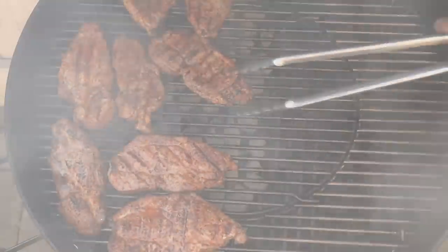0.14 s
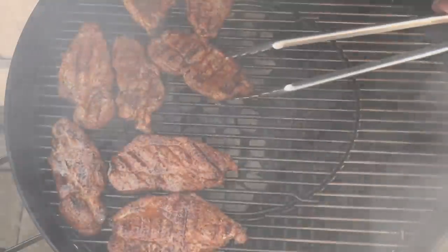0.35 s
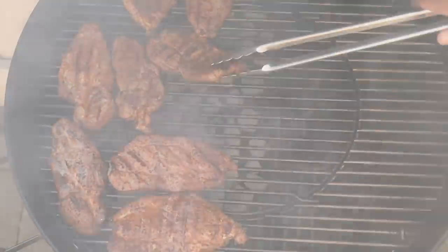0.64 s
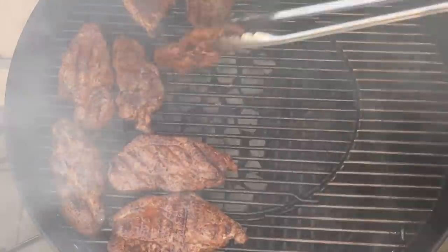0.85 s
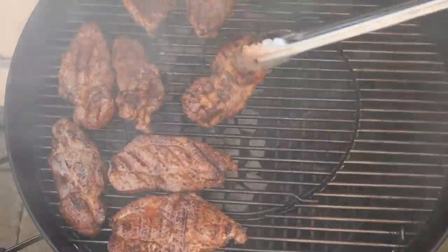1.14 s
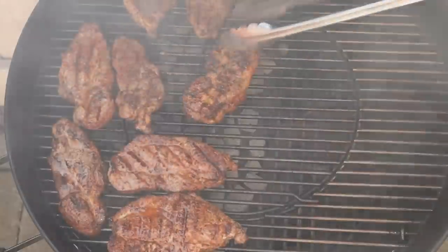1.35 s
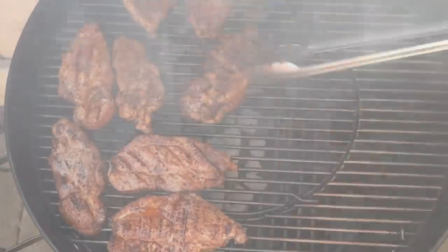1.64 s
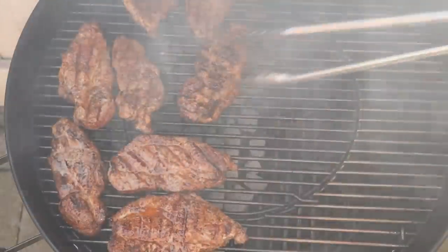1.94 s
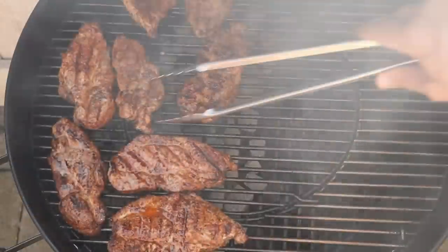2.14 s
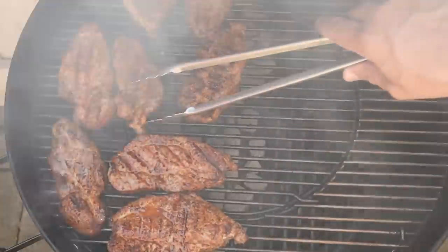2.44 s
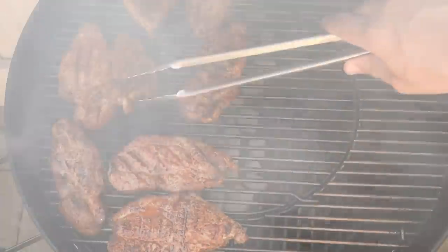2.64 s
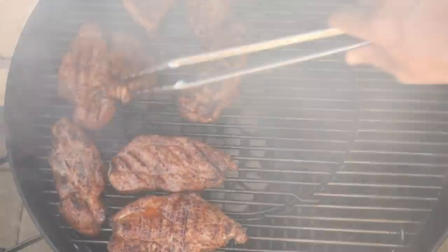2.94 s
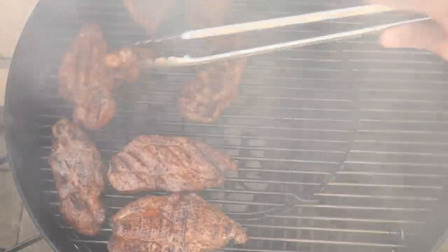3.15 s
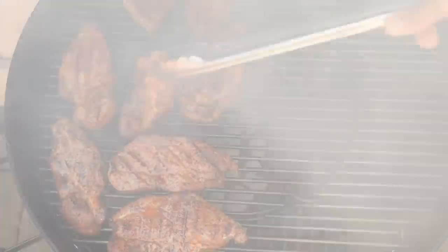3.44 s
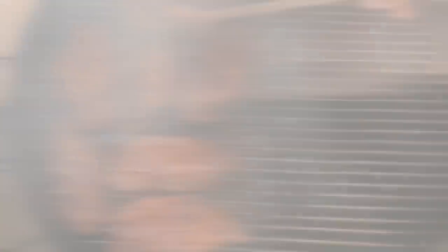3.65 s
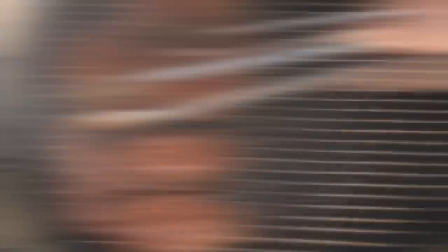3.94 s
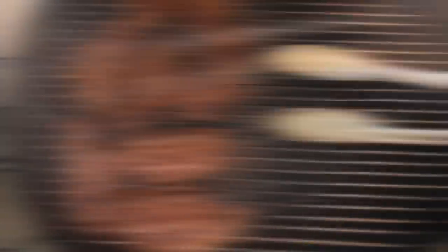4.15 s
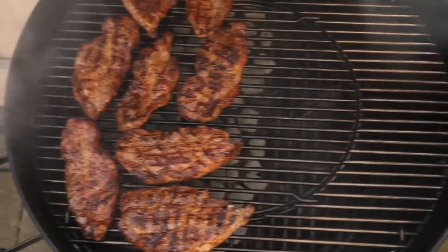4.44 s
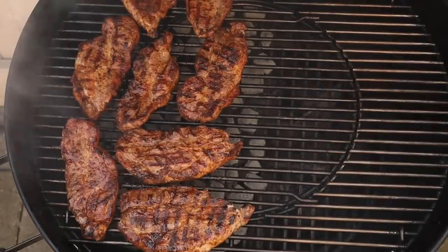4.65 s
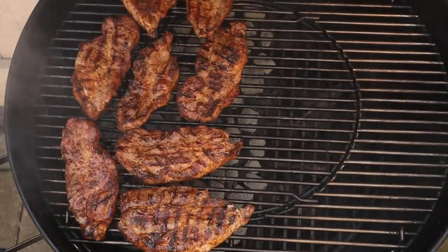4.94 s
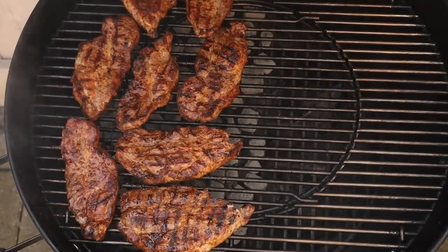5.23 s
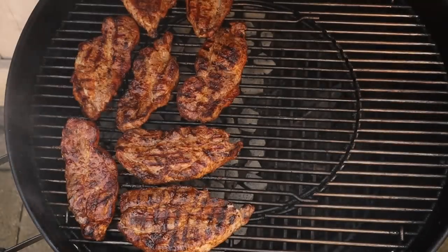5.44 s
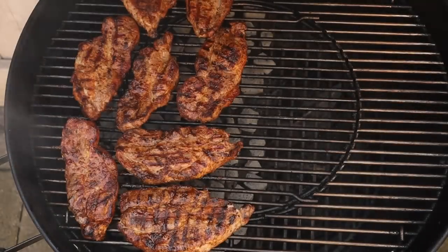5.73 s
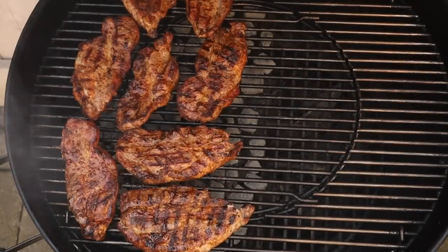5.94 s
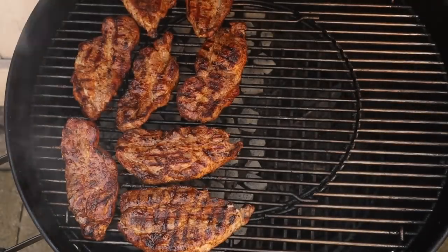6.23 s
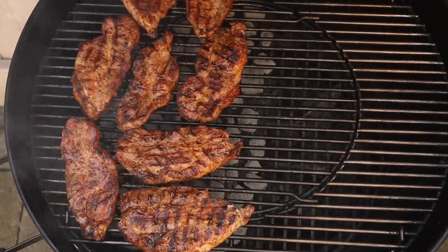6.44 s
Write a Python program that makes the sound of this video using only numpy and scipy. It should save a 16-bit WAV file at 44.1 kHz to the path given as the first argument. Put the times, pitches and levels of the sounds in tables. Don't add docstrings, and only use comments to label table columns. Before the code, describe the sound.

Close to the microphone, meat fizzes on a kettle grill outdoors over faint town hum and distant traffic. Faint tong taps and fat pops come first; a turned piece hisses up brightly, then dripping fat flares on the coals. After a soft change the sizzle calms, and tongs scrape wood, drop hard and clatter to a stop.

```python
import sys
import numpy as np
from scipy import signal
from scipy.fft import rfft, irfft, next_fast_len
from scipy.io import wavfile
from scipy.ndimage import uniform_filter1d

SR = 44100
rng = np.random.default_rng(int(sys.argv[2]) if len(sys.argv) > 2 else 0)


def voltage_ratio(decibels):
    exponent = np.asarray(decibels, float) / 20
    return 10 ** exponent


def wav_out(sig):
    wavfile.write(sys.argv[1], SR, np.round(np.clip(np.atleast_2d(sig).T, -1, 1) * 32767).astype(np.int16))


N = 290619
TIME = np.arange(N) / SR
GROUND_MS = 3.45
TOP_HZ = 15750
# (time [s], browned side [0-1], freshly turned side [0-1], later moment [0-1])
STAGE = [
    (0, 0.94, 0, 0.01),
    (1.215, 0.82, 0.05, 0.02),
    (1.27, 0.31, 0.98, 0.05),
    (3.97, 0.09, 0.89, 0.09),
    (4.03, 0.03, 0.65, 0.23),
    (4.6, 0.01, 0.01, 0.85),
    (6.59, 0.15, 0.26, 1),
]


def read(table):
    s, *columns = np.transpose(table)
    return [np.interp(TIME, s, column) for column in columns]


def unit(x, lo_hz, hi_hz):
    f = np.fft.rfftfreq(N, 1 / SR)
    power = np.abs(rfft(x)) ** 2
    return x * N / np.sqrt(2 * power[(f > lo_hz) & (f < hi_hz)].sum())


def colour(x, spectrum, echoes):
    hz, db = np.transpose(spectrum)
    f = np.fft.rfftfreq(4096, 1 / SR)
    log_gain = np.interp(np.log(f + 1), np.log(hz), db) * np.log(10) / 20
    cepstrum = irfft(log_gain)
    cepstrum[1:2048] *= 2
    cepstrum[2049:] = 0
    comb = 1 + sum(gain * np.exp(-2j * np.pi * f * ms / 1000) for ms, gain in echoes)
    return signal.fftconvolve(x, irfft(np.exp(rfft(cepstrum)) * comb))[:N]


def band(x, hz, width_hz):
    return signal.lfilter(*signal.iirpeak(hz, hz / width_hz, SR), x)


def walk(rate):
    k = int(SR / rate)
    steps = np.repeat(rng.standard_normal(N // k + 1), k)
    return 1.44 * uniform_filter1d(uniform_filter1d(steps, k), k)[:N]


def bubbles(rate, spread_db, steam):
    burst = rng.random(N) < rate / SR
    sign = rng.standard_normal(N)
    size = rng.exponential(size=N)
    noise = rng.standard_normal(N)
    pops = burst * sign * voltage_ratio(spread_db * np.minimum(size, 4))
    share = np.clip(steam, 0, 1)
    return np.sqrt(1 - share) * pops / pops.std() + np.sqrt(share) * noise


def ring(hz, t60, length=.15):
    t = TIME[:int(length * SR)]
    return np.sin(2 * np.pi * hz * t) * np.exp(-np.log(1000) * t / t60)


def add(out, s, sound):
    i = int(s * SR)
    out[i:i + len(sound)] += sound[:N - i]


def gusts(events, rate, steam, flicker_db):
    out = 0
    for s, rise, hold, t60, hz, width_hz, db in events:
        fade = voltage_ratio(-60 * np.maximum(TIME - s - rise - hold, 0) / t60)
        shape = np.clip((TIME - s) / rise, 0, 1) * fade
        grains = band(band(bubbles(rate, 2.6, steam), hz, width_hz), hz, 1.8 * width_hz)
        out = out + voltage_ratio(db + flicker_db * walk(60)) * shape * grains / grains.std()
    return out


def garden():
    # (frequency [Hz], level [dB per Hz])
    hum_colour = [(59, -51), (100, -2.5), (356, -2), (394, -2), (579, -1), (718, -4.5), (842, -5),
                  (1500, -10), (1950, -31), (3300, -120)]
    # (frequency [Hz], level [dB per Hz])
    rumble_colour = [(15, -30), (30, -10), (48, -14.5), (60, -6), (69, 2), (80, -6), (120, -6),
                     (170, -10.5), (300, -42.5)]
    # (time [s], half length [s], extra level [dB])
    traffic = [
        (0.0, 0.2, 4.5),
        (0.7, 0.08, 3),
        (1.98, 0.15, 0.5),
        (2.46, .04, -9),
        (3.317, .06, 7.0),
        (3.58, 0.13, 6.5),
        (3.925, 0.12, 5),
        (4.3, .12, -6),
        (5.55, 0.14, -4.0),
    ]
    hum_db, late_hum_db = -57.5, -62.5
    rumble_db, late_rumble_db = -67.5, -68.5
    later = np.clip(read(STAGE)[2], 0, 1)
    early_hum, late_hum = (unit(colour(rng.standard_normal(N), hum_colour, [(GROUND_MS, gain)]), 150, 1130)
                           for gain in (.55, .15))
    hum = np.sqrt(1 - later) * voltage_ratio(hum_db) * early_hum + np.sqrt(later) * voltage_ratio(late_hum_db) * late_hum
    rumble = unit(colour(rng.standard_normal(N), rumble_colour, []), 40, 123)
    swell_db = sum(db * np.exp(-((TIME - s) / half) ** 2) for s, half, db in traffic)
    level_db = rumble_db + later * (late_rumble_db - rumble_db) + swell_db
    return voltage_ratio(1.0 * walk(8)) * hum + voltage_ratio(level_db + 1.4 * walk(9)) * rumble


def drags():
    # (time [s], hold [s], frequency [Hz], width [Hz], level [dB])
    scrapes = [(5.11, .12, 800, 160, -50.5), (5.12, 0.052, 2800, 780, -59), (5.115, 0.066, 1020, 120, -58),
               (5.13, 0.07, 2050, 350, -51), (5.28, 0.032, 800, 130, -47.5), (5.191, 0.04, 230, 100, -56),
               (0.086, 0.19, 220, 160, -58), (5.36, .08, 160, 98, -54), (4.9, .025, 215, 110, -57),
               (5.73, 0.027, 125, 54, -51.5), (5.13, .12, 300, 350, -60), (5.4, .06, 350, 400, -53),
               (5.69, 0.052, 450, 600, -54), (1.083, 0.13, 360, 810, -61), (4.0, .4, 600, 800, -60),
               (5.72, .04, 95, 50, -63), (2.31, 0.26, 150, 70, -66)]
    events = [(s, 0.4 * hold, hold, 4.1 * hold, hz, width_hz, db) for s, hold, hz, width_hz, db in scrapes]
    return gusts(events, 1500, 0.54, 0.99)


def knocks():
    # (time [s], peak level [dB], board frequency [Hz], crack level [dB], crack frequency [Hz])
    landings = [(5.354, -23, 420, -7.5, 2100), (5.362, -35, 280, 1, 2120), (5.371, -44, 328, -6, 2240),
                (5.381, -42, 360, -1, 2090), (5.393, -38, 355, -11, 2200), (5.404, -44, 444, -5, 1920),
                (5.429, -30.5, 356, 0, 1400), (5.444, -36, 397, -4, 1470), (5.462, -39, 394, -10, 1900),
                (5.474, -51, 353, -6, 1790), (5.5, -48, 361, -12, 1870), (5.633, -28.5, 403, -6.5, 2300),
                (5.644, -39, 310, -18, 1110), (5.655, -38, 480, -19, 2550), (5.684, -45, 468, -15, 1880),
                (5.704, -36, 357, -16, 1890), (5.726, -39, 538, -6, 1110), (5.734, -38, 476, -6, 1400),
                (5.752, -34, 378, -11, 1300), (5.769, -39.5, 482, -15, 1340), (5.786, -44, 511, -13, 1880),
                (5.799, -48, 462, -5, 1820)]
    # (frequency [Hz], t60 [s], level [dB])
    table_modes = [(150, .06, -32), (213, .06, -24), (326, 0.071, -10), (530, 0.053, -7.5),
                   (740, .04, -9.5), (830, 0.033, -10.5), (1060, 0.025, -16)]
    push_ms, crack_rise_ms = 3.85, 1.7
    out, t = np.zeros(N), TIME[:int(.15 * SR)]
    for s, db, board_hz, crack_db, crack_hz in landings:
        rough = rng.standard_normal(len(t))
        weight = voltage_ratio(2.0 * rng.standard_normal(len(table_modes)))
        push = rough * np.exp(-t * 1000 / push_ms)
        board = ring(board_hz, 0.038) * np.minimum(t * 1000 / push_ms, 1)
        modes = sum(w * voltage_ratio(mode_db + (crack_db + 11.0 if hz > 700 else 0)) * ring(hz, t60)
                    for w, (hz, t60, mode_db) in zip(weight, table_modes))
        shaken = signal.fftconvolve(modes, push / np.sqrt(np.sum(push ** 2)))[:len(t)]
        crack_fade = np.exp(-t / 0.0065) + 0.45 * np.exp(-t / 0.02)
        crack = rough * np.minimum(t * 1000 / crack_rise_ms, 1) * crack_fade
        crack = band(band(band(crack, crack_hz, 2000), 1500, 2600), 1700, 3600)
        blow = board / np.abs(board).max() + 0.79 * shaken + voltage_ratio(crack_db + 8.0) * crack
        add(out, s - .001, voltage_ratio(db) * blow)
    t = TIME[:9000]
    walls = rng.standard_normal(9000) * voltage_ratio(-60 * t / 0.24) * np.minimum(t / 0.0071, 1)
    wet = out + voltage_ratio(-40.0) * signal.fftconvolve(out, walls)[:N]
    return signal.sosfilt(signal.butter(N=4, Wn=190, btype="high", fs=SR, output="sos"), wet)


def crackles():
    # (time [s], peak level [dB], frequency [Hz])
    lone_pops = [(0.0472, -34, 2480), (0.0744, -36, 2710), (0.5781, -30, 2800), (0.6659, -34, 4750),
                 (0.8794, -34, 2430), (1.6523, -32, 3700), (1.8382, -30, 2400), (2.3004, -31.5, 1300),
                 (2.4614, -27, 2550), (3.4114, -31, 2446), (4.027, -35, 1500), (4.324, -27, 2680)]
    # (time [s], peak level [dB], frequency [Hz])
    taps = [
        (0.049, -52, 604),
        (0.093, -43, 587),
        (0.108, -41.5, 584),
        (0.12, -44, 552),
    ]
    length = int(.15 * SR)
    out = np.zeros(N)
    for s, db, hz in lone_pops:
        thump = -voltage_ratio(db) * ring(hz, 6.4 / hz)
        snap = voltage_ratio(db - 6) * rng.standard_normal(length) * ring(SR / 4, 0.012)
        add(out, s, thump + snap)
    bowl_echo = 0.29 * np.roll(out, int(0.00084 * SR))
    ground_echo = 0.33 * np.roll(out, int(GROUND_MS * SR / 1000))
    out = out + bowl_echo + ground_echo
    out = signal.sosfilt(signal.butter(N=2, Wn=700, btype="high", fs=SR, output="sos"), out)
    for s, db, hz in taps:
        add(out, s, voltage_ratio(db + 3.5) * ring(hz, .05) * np.minimum(TIME[:length] / 0.0031, 1))
    return out


def flares():
    # (time [s], fade t60 [s], frequency [Hz], width [Hz], level [dB])
    flashes = [(2.411, 0.77, 2730, 540, -43.5), (2.43, .15, 3430, 420, -48),
               (2.41, 0.18, 2700, 5000, -45.5), (3.553, 0.3, 9500, 4600, -36.5),
               (3.562, 0.17, 7570, 510, -47), (3.566, 0.2, 4500, 3500, -46), (1.79, 0.21, 2460, 790, -51),
               (4.012, .06, 2300, 2700, -52.5), (1.26, 8.6, 4770, 340, -55), (1.225, 1.5, 11000, 5000, -49),
               (3.6, 1.1, 8200, 3000, -52), (2.47, 0.68, 3400, 640, -53), (1.32, 7, 1290, 280, -60.5)]
    rise_s, hold_s = 0.011, 0.03
    events = [(s, rise_s, hold_s, t60, hz, width_hz, db) for s, t60, hz, width_hz, db in flashes]
    return gusts(events, 4000, 0.68, 1.1)


def sizzle():
    # (time [s], level [dB])
    heat = [(0, -45), (0.5, -46), (1.215, -47.5), (1.29, -42.5), (1.45, -43), (1.85, -41.5), (2.32, -44),
            (2.7, -44), (3.0, -42.8), (3.15, -44.5), (3.5, -43.5), (3.7, -41.5), (3.95, -42.8),
            (4.15, -41.5), (4.75, -45.5), (5.0, -45.4), (5.7, -48.5), (6.59, -50)]
    # (frequency [Hz], level [dB per Hz])
    browned = [(500, -18.5), (900, -10.5), (1500, -5.5), (2100, -2.5), (2600, 0), (3200, -3.5),
               (5200, -4.5), (8000, -4), (12000, -3.5), (13500, -6.5), (15700, -10)]
    # (frequency [Hz], level [dB per Hz])
    turned = [(500, -24.5), (900, -12), (1300, -2), (2000, -7), (2400, -1), (3200, -3), (4100, -3),
              (4750, -3.5), (5300, -4), (6500, -4), (10000, -2.5), (12000, -4), (13500, -5), (15700, -8.5)]
    # (frequency [Hz], level [dB per Hz])
    later = [(500, -23), (950, -10), (1300, -5), (1850, 1.5), (2250, -5.5), (2750, -1), (3900, -1),
             (5700, -3.5), (8000, -4.5), (12000, -4), (13500, -6), (15700, -10.5)]
    # (delay [ms], gain [ratio])
    bowl = [
        [(.39, 0.05), (.96, -0.078)],
        [(0.839, 0.17), (0.37, -0.0039), (1.4, -0.036)],
        [(.59, 0.041), (.77, .12), (.93, -0.028)],
    ]
    # (level at usual boiling [dB], change per dB of boiling [dB])
    body_balance = [
        (-1.5, -0.8),
        (1.7, -1.68),
        (1.6, 1.1),
    ]
    usual_db = -44.5
    level_db, = read(heat)
    shares = np.clip(read(STAGE), 0, 1)
    body_db = sum(share * (db + slope * (level_db - usual_db))
                  for share, (db, slope) in zip(shares, body_balance)) / shares.sum(axis=0)
    out = 0
    for share, spectrum, echoes in zip(shares, (browned, turned, later), bowl):
        fizz = bubbles(1500, 3.0, .85) * voltage_ratio(.5 * walk(30) + 0.22 * walk(13))
        out = out + np.sqrt(share) * unit(colour(fizz, spectrum, echoes), 2900, 14400)
    body = signal.lfilter(*signal.butter(N=1, Wn=3000, fs=SR), out)
    balanced = out + (voltage_ratio(body_db + 1.06 * walk(9)) - 1) * body
    return voltage_ratio(level_db + 0.49 * walk(6)) * balanced


def scene():
    mono = garden() + drags() + knocks() + crackles() + flares() + sizzle()
    return np.array([mono, mono])


def low_pass(x):
    return signal.sosfilt(signal.butter(12, 16900, fs=SR, output="sos"), x)


def record(dry):
    # (time [s], low edge [Hz], high edge [Hz], level [dB])
    puffs = [(0.45, 13210.0, 15770.0, -60.6), (0.916, 5790, 6870.0, -65), (1.289, 10380.0, 11540.0, -52),
             (1.668, 11080.0, 12300, -55), (1.901, 5330.0, 14720.0, -53), (4.243, 6380.0, 15440.0, -55),
             (4.432, 5730.0, 7530.0, -54.9), (4.713, 4650.0, 5600.0, -57.9), (5.123, 4760.0, 15580.0, -65),
             (5.306, 6360.0, 10990.0, -59), (6.148, 6450, 14530.0, -56.5), (6.24, 4390.0, 12960, -61),
             (6.443, 6320, 14220.0, -59)]
    side, window = np.zeros(N), np.hanning(2048)
    for s, lo_hz, hi_hz, db in puffs:
        edges_hz = [lo_hz, min(hi_hz, TOP_HZ)]
        sos = signal.butter(N=6, Wn=edges_hz, btype="band", fs=SR, output="sos")
        noise = signal.sosfilt(sos, rng.standard_normal(2048))
        add(side, s - 1024 / SR, voltage_ratio(db + 2) * window * noise / noise.std())
    size = next_fast_len(N)
    spectrum = rfft(dry + np.array([side, -side]), size)
    spectrum[:, np.fft.rfftfreq(size, 1 / SR) > TOP_HZ] = 0
    mix = irfft(spectrum, size)[:, :N]
    return low_pass(mix)


dry = scene()
out = record(dry)
wav_out(out)
```